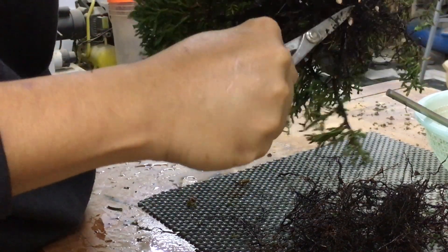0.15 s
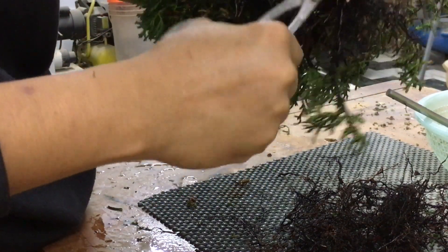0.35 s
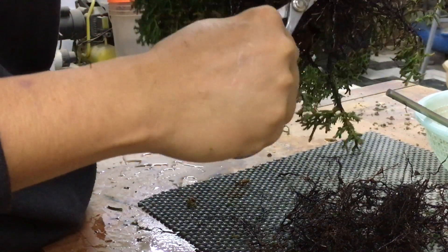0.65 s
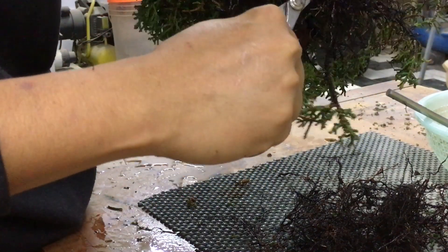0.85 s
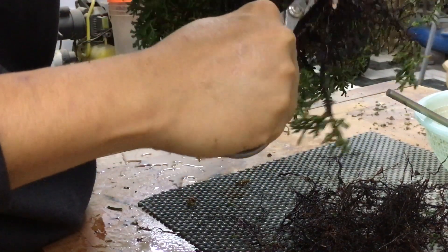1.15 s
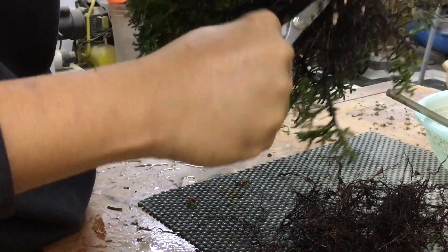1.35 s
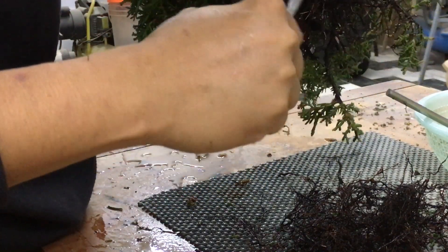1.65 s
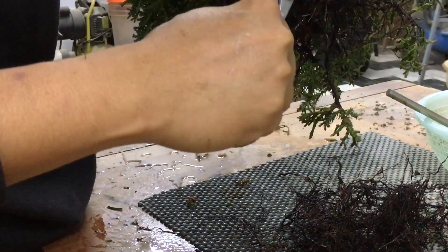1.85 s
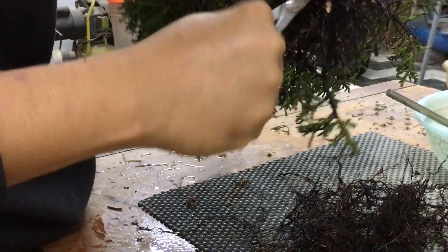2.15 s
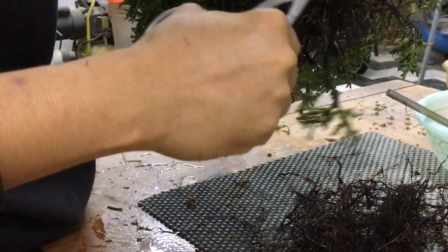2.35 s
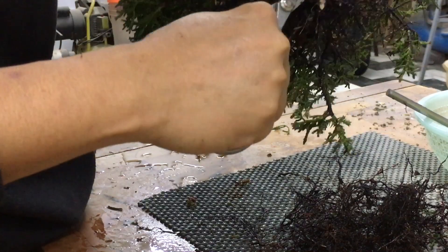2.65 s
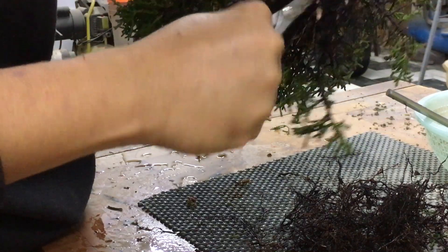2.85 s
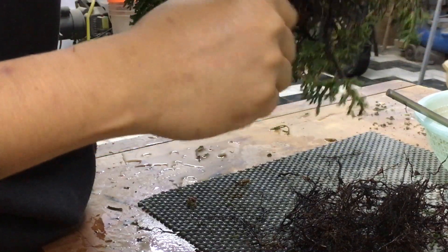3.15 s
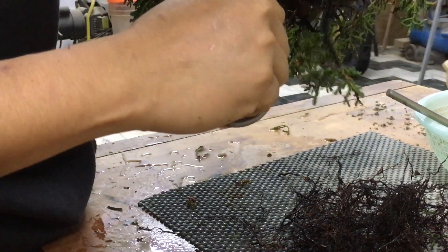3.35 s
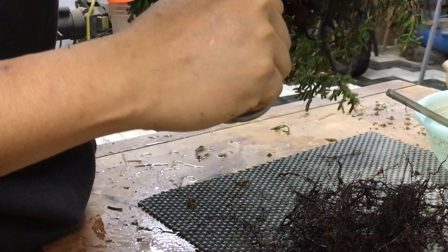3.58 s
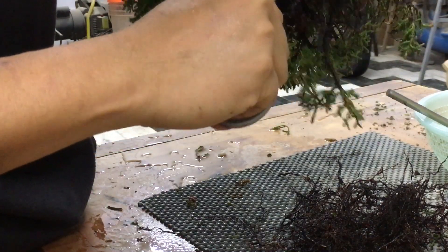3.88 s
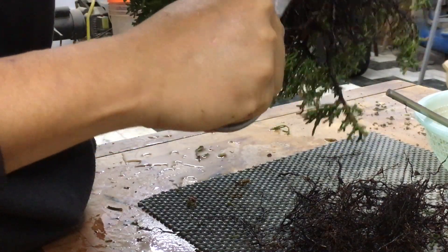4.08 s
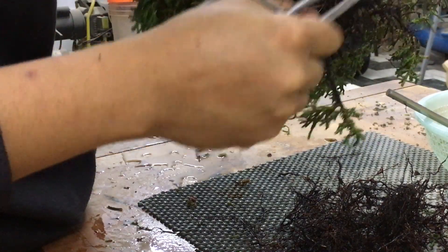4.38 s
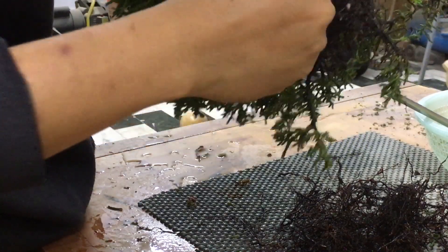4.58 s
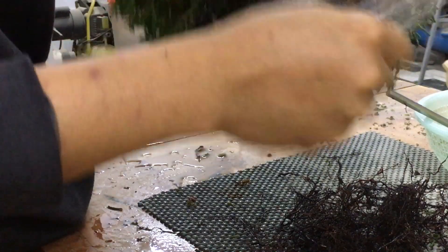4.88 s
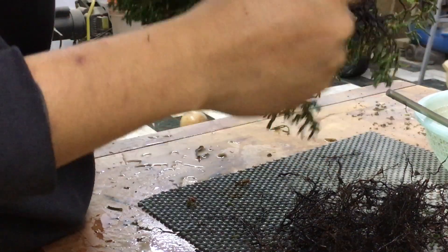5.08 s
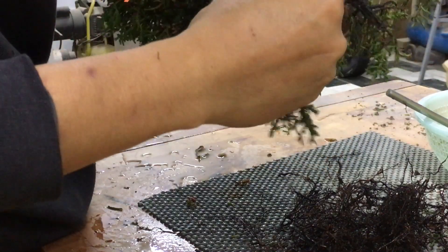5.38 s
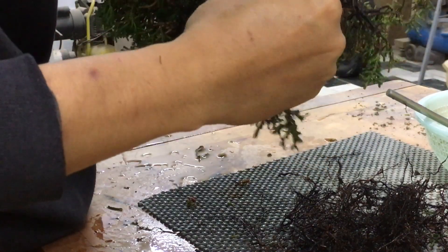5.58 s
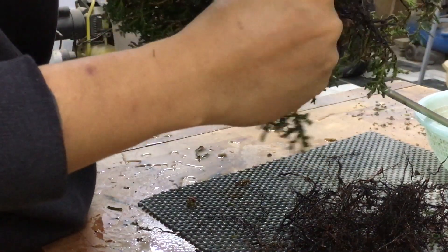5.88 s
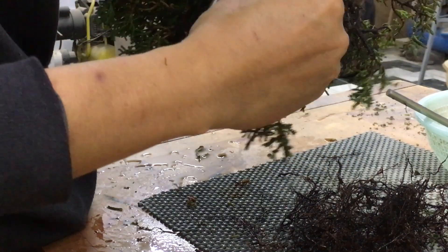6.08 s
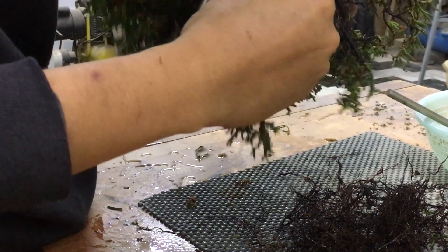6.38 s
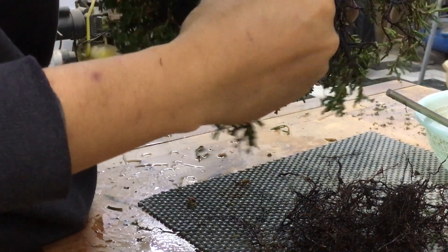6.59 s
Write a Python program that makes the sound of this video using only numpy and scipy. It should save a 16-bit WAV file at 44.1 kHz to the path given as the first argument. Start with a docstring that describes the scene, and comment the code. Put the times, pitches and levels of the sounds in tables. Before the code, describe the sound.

Close, slightly hissy phone pickup in a large shed with low, wavering traffic rumble outside. At 0.12 s scissors slam through a woody root: a loud, bright, dry crack with a tiny fibre snap just before it, a very short steel ring and an airy tail under half a second. Faint ticks follow, then a lighter double click around 1.3 s with a soft needle rustle. A second snip lands at 2.07 s, a little softer; small crackles gather from 2.6 s into a third at 2.79 s. Weak ticks and leafy brushes pass at 3.1 to 3.6 s before the strong fourth snip at 4.12 s. From about 4.5 s an engine approaches outside, a low uneven drone, joined after 5 s by puffing clatter and a thin rough whine that steps up slightly near 6 s. Twigs rustle at 6.3 s; a dull wooden knock sounds at 6.63 s.

```python
"""Root snipping in a shed

Small steel scissors snip woody roots at a worktable in a large shed, close to a phone microphone.
Fibres crack just before the blades slam shut: noise bursts with damped blade rings and a shed tail.
Twigs tick in short noise bursts, foliage rustles in noise swells, and damped modes make a wooden knock.
Outside, shaped noise and a low tone rumble as traffic; an engine of firing multiples draws nearer, whining."""
import sys
import numpy as np
from scipy import signal
from scipy.fft import rfft, irfft, next_fast_len
from scipy.io import wavfile
from scipy.ndimage import map_coordinates

SR = 44100
rng = np.random.default_rng(int(sys.argv[2]) if len(sys.argv) > 2 else 0)


def store_pcm(level_fs):
    """Save levels as 16-bit WAV."""
    pcm = np.round(np.clip(level_fs, -1, 1) * 32767).astype(np.int16)
    wavfile.write(sys.argv[1], SR, np.atleast_2d(pcm).T)


N = 296793  # samples
STEADY_TOP_HZ = 15800  # upper edge of hiss, clatter, rustles and shed tail


def amp(db):
    """Decibels to linear gain."""
    return 10 ** (np.asarray(db) / 20)


def unit(x):
    """Scale a signal to rms 1."""
    return x / np.sqrt(np.mean(x ** 2) + 1e-20)


def along(points, hz):
    """Read (frequency, value) points on a log frequency axis."""
    f, v = np.transpose(points)
    return np.interp(np.log(hz + 1), np.log(f + 1), v)


def curves(rows):
    """One value per sample for each column after the time."""
    s, *cols = np.transpose(rows)
    return [np.interp(np.arange(N) / SR, s, c) for c in cols]


def wobble(rate):
    """A smooth random curve, rate knots a second."""
    knots = rng.standard_normal(N // 100 + 9)
    return map_coordinates(knots, [np.arange(N) * rate / SR])


def filtered(x, response):
    """Shape the spectrum of x by a gain that depends on frequency."""
    m = next_fast_len(len(x) + 8192)
    hz = np.fft.rfftfreq(m, 1 / SR)
    return irfft(rfft(x, m) * response(hz), m)[:len(x)]


def noise(response, size=N):
    """Coloured noise of rms 1."""
    return unit(filtered(rng.standard_normal(size), response))


def add(track, s, sound):
    """Mix a sound in at a time in seconds, cut off at the end of the track."""
    part = track[round(s * SR):][:len(sound)]
    part += sound[:len(part)]


def band(centre_hz, octaves):
    """A bell-shaped pass band on a log axis, closing steeply above 16 kHz."""
    return lambda hz: np.exp(-(np.log2((hz + 1) / centre_hz) / octaves) ** 2) / (1 + (hz / 16000) ** 40)


def thin(x):
    """Things this small send out no bass: a steep fall below 950 Hz."""
    return filtered(x, lambda hz: 1 / np.sqrt(1 + (950 / (hz + 1)) ** 8))


def ringing(modes, t):
    """Damped modes, struck a little differently each time."""
    out = 0
    for hz, db, t60 in modes:
        strike_db = db + rng.normal(0, 1.2)
        out = out + amp(strike_db - 60 * t / t60) * np.sin(2 * np.pi * hz * t)
    return out


# Spectra of rumble, boom, tyre roar and microphone hiss: (frequency [Hz], relative density [dB per Hz])
RUMBLE_COLOUR = [(14, -28), (22, -6), (32, -1.5), (45, -0.5), (70, 4.5), (90, -6.5), (115, -49.5),
                 (160, -100)]
BOOM_COLOUR = [(90, -92.5), (120, -43.5), (150, 2), (168, 3.5), (195, 3.5), (230, -17), (300, -87.5)]
ROAR_COLOUR = [(47, -37), (80, -0.5), (113, -0.5), (197, -8.5), (230, -2.5), (407, -11), (501, -17.5),
               (672, -15), (758, -16), (827, -15.5), (1520, -17), (3730, -25.5), (5000, -34.5), (6500, -80),
               (11000, -120)]
HISS_COLOUR = [(2500, -29.5), (3300, -14), (4300, -10), (4900, -17.5), (5500, -6.5), (6500, -7.5),
               (7600, -10.5), (9300, -7), (10000, -8.5), (10500, -13), (11200, -6.5), (13500, -6),
               (15800, -7)]
# Rides of the rumble's throb, the boom and the tyre roar, before their wavering: (time [s], level [dB])
THROB_RIDE = [(0, -53.5), (.8, -57), (1.1, -63.5), (1.3, -54.5), (2, -59.5), (2.5, -51), (2.85, -52.5),
              (3.2, -59), (3.8, -63), (4.05, -54.5), (4.8, -62), (5.4, -63), (5.65, -60), (6.2, -63.5),
              (6.35, -52), (6.73, -63)]
BOOM_RIDE = [(0, -65), (1.1, -65.5), (2.2, -59), (2.9, -61), (3.3, -55.5), (3.7, -59.5), (5, -63),
             (6.73, -62.5)]
ROAR_RIDE = [(0, -58), (1.18, -56.5), (1.8, -57.5), (2.4, -61), (4.42, -60.5), (5.44, -55.5), (5.83, -56),
             (6.49, -57.5), (6.73, -55.5)]


def street():
    """Traffic as a wavering low tone with noise, a boom and tyre roar, over steady microphone hiss."""
    (throb_db,), (boom_db,), (roar_db,) = curves(THROB_RIDE), curves(BOOM_RIDE), curves(ROAR_RIDE)
    throb_hz = 55 + 3.5 * wobble(14)
    throb = np.sqrt(2) * np.sin(2 * np.pi * np.cumsum(throb_hz) / SR)
    swell_db = 3 * wobble(3)
    rumble = amp(throb_db + 3.3 * wobble(12)) * throb
    rumble += amp(-63.0 + swell_db) * noise(lambda hz: amp(along(RUMBLE_COLOUR, hz)))
    boom = amp(boom_db + 1.5 * wobble(5.5)) * noise(lambda hz: amp(along(BOOM_COLOUR, hz)))
    roar = amp(roar_db + 0.67 * wobble(4)) * noise(lambda hz: amp(along(ROAR_COLOUR, hz)))
    hiss = amp(-70.5) * noise(lambda hz: amp(along(HISS_COLOUR, hz)) * (hz < STEADY_TOP_HZ))
    return rumble + boom + roar + hiss


def peaks(modes, hz):
    """Combined gain of a row of resonances, summed as power."""
    return np.sqrt(sum(amp(db) ** 2 / (1 + (2 * (hz - c) / w) ** 4) for c, w, db in modes))


# Engine approach: (time [s], firing rate [Hz], level [dB])
ENGINE_RIDE = [(4.2, 37.4, -79.5), (4.6, 37.7, -64), (4.95, 38.8, -60.5), (5.4, 40, -55.5),
               (5.6, 37.6, -56.5), (5.85, 39, -58), (6.28, 39.1, -56.5), (6.6, 37.5, -60),
               (6.73, 39.1, -66.5)]
# Engine tones: (multiple of the firing rate [-], relative level [dB], wander [dB])
FIRING_TONES = [(2, -17.5, 5.5), (4, 0, 2.5), (5, -2, 4.5), (6, -12.5, 2.5), (7, -14, 4.5), (8, -18, 4),
                (9, -11, 5.5), (12, -19, 5.5), (14, -22.5, 5)]
# Casing clatter, before its puffing: (time [s], level [dB])
CLATTER_RIDE = [(4.9, -85), (5.35, -66), (5.7, -65.5), (5.9, -69.5), (6.73, -68.5)]
# Casing resonances: (frequency [Hz], width [Hz], relative level [dB])
CASING_MODES = [(1230, 90, 4), (1380, 110, -2.5), (1650, 82, -3.5), (2650, 35, -1.5), (3150, 97, -8),
                (3320, 120, -6.5), (6140, 1500, -14.5)]
# Gear whine, before its roughness: (time [s], frequency [Hz], level [dB])
WHINE_RIDE = [(5, 2070, -91.5), (5.3, 2025, -64), (5.8, 1985, -68), (5.93, 2000, -71.5),
              (5.98, 2200, -64.5), (6.1, 2205, -68), (6.73, 2210, -67)]


def engine():
    """Wandering multiples of the firing rate, casing clatter puffed once a firing, and a rough gear whine."""
    (firing_hz, level_db), (clatter_db,) = curves(ENGINE_RIDE), curves(CLATTER_RIDE)
    firing_phase = 2 * np.pi * np.cumsum(firing_hz) / SR
    drone = np.zeros(N)
    for multiple, db, wander_db in FIRING_TONES:
        tone_db = level_db + db + wander_db * wobble(9)
        drone += np.sqrt(2) * amp(tone_db) * np.sin(multiple * firing_phase + .7 * wobble(9))
    casing = noise(lambda hz: peaks(CASING_MODES, hz) * (hz < STEADY_TOP_HZ))
    clatter = amp(clatter_db + 2.0 * np.cos(firing_phase)) * casing
    whine_hz, whine_db = curves(WHINE_RIDE)
    roughness = .4 + .9 * wobble(260)
    whine = amp(whine_db) * roughness * np.sin(2 * np.pi * np.cumsum(whine_hz) / SR)
    return drone + clatter + whine


# Foliage swells: (middle time [s], level [dB])
BRUSHES = [(.64, -74.5), (1.0, -75), (1.233, -72), (1.328, -71), (2.04, -67), (2.66, -76), (3.191, -73),
           (3.567, -66.5), (4.042, -68), (4.73, -71.5), (4.851, -74), (6.295, -68), (6.42, -72)]


def foliage():
    """Needles brush past each other: swells of lumpy bright noise."""
    half_length_s, centre_hz = .038, 12500
    out, t = np.zeros(N), np.arange(-8000, 8000) / SR
    lumps = amp(4 * wobble(200))
    swell = np.exp(-(t / half_length_s) ** 2)
    for middle_s, db in BRUSHES:
        swish = noise(lambda hz: band(centre_hz, .7)(hz) * (hz < STEADY_TOP_HZ), size=len(t))
        add(out, middle_s + t[0], amp(db) * swell * swish)
    return out * unit(lumps)


# Something set down across the shed: (time [s], level [dB])
KNOCK_HITS = [(6.628, -46)]
# Wooden modes of the knock: (frequency [Hz], relative level [dB], t60 [s])
WOOD_MODES = [(408, 7.5, 0.052), (522, 2.5, 0.034), (690, -5, 0.056), (983, 1, 0.051), (2040, -6, .05),
              (2210, -3.5, 0.041), (2590, -5, 0.036)]


def knock():
    """A dull wooden knock: damped modes behind a soft 2 ms onset."""
    out, t = np.zeros(N), np.arange(4000) / SR
    for s, db in KNOCK_HITS:
        onset = 1 - np.exp(-t / 0.002)
        add(out, s, amp(db) * ringing(WOOD_MODES, t) * onset)
    return out


# Decay of the shed's diffuse tail: (frequency [Hz], t60 [s])
SHED_DECAY = [(1000, .3), (2600, 0.45), (7000, 0.48), (11000, 0.39), (15000, 0.21)]
# Echoes off the near walls: (delay [s], relative level [dB])
WALL_ECHOES = [(.011, -22), (.0225, -23)]


def shed(sound, db, colour):
    """A sound with two wall echoes and a diffuse tail that dies at its own speed for each frequency."""
    air = noise(lambda hz: colour(hz) * (hz < STEADY_TOP_HZ) * (hz > 2000), size=30000)
    hz, t, z = signal.stft(air, SR, nperseg=128)
    decay = amp(-60 * t / along(SHED_DECAY, hz)[:, None])
    tail = signal.istft(z * decay, SR, nperseg=128)[1]
    tail = tail * (1 - np.exp(-np.arange(len(tail)) / SR / .003))  # builds up as more walls join
    out = amp(db) * np.linalg.norm(sound) * tail / np.linalg.norm(tail)  # db: tail energy against the sound
    add(out, 0, sound)
    for delay, wall_db in WALL_ECHOES:
        add(out, delay, amp(wall_db) * sound)
    return out


def click(db, t):
    """The dull push under a crack: one heavily damped swing."""
    return amp(db - 60 * t / 0.0012) * np.sin(2 * np.pi * 1700 * t)


# Fibre cracks and twig ticks: (time [s], level [dB], centre [Hz], width [octaves])
CRACKS_AND_TICKS = [(0.1145, -42, 11120, .9), (0.1175, -24, 11960, 1), (.465, -57, 11030, .9),
                    (0.7118, -51.5, 8500, 1), (1.2726, -26, 13300, 1.33), (1.3010, -30.5, 12300, 1.1),
                    (1.4078, -37, 8900, 2), (1.628, -55.5, 11000, 1), (2.0624, -41, 10640, 1.5),
                    (2.0692, -29, 12260, 0.91), (2.626, -49, 12000, 1.06), (2.642, -59, 10040, .8),
                    (2.657, -55, 13500, .4), (2.702, -58, 13000, .5), (2.726, -35, 13500, 1.25),
                    (2.7572, -37.5, 11850, 0.87), (2.7735, -43, 12300, .54), (2.778, -32, 12050, .6),
                    (2.7818, -30, 11740, .6), (2.785, -35, 13020, 0.85), (3.1279, -49, 6500, 0.67),
                    (3.129, -49, 2600, 0.2), (3.1724, -48, 11400, 0.9), (3.5519, -51.5, 8950, 1.4),
                    (3.584, -47.5, 11000, 1.9), (4.107, -48, 11000, .4), (4.111, -35.5, 10990, 0.97),
                    (4.1147, -27.5, 11500, .45), (4.727, -55, 12960, .4), (4.7538, -54, 13960, .31),
                    (5.074, -48, 5000, 2.3), (6.2523, -45, 9520, 1.1), (6.297, -57, 13080, .39),
                    (6.415, -56, 14520, 0.29), (6.628, -48.5, 8900, .39)]


def ticks():
    """Each tick is a sharp noise burst around its own centre, over a dull click that grows with it."""
    tail_t60, skirt_db = 0.012, -20  # s; weak broad crackle under each band
    click_db, click_grows = -39, .5  # click under a -40 dB tick; dB per dB of tick
    out, t = np.zeros(N), np.arange(3000) / SR
    fall = amp(-60 * t / 0.0029) + .6 * amp(-60 * t / tail_t60)
    envelope = fall * (1 - np.exp(-t / 0.00013))
    for s, db, centre_hz, octaves in CRACKS_AND_TICKS:
        colour = lambda hz: band(centre_hz, octaves)(hz) + amp(skirt_db) * band(6000, 1.8)(hz)
        burst = amp(db) * envelope * noise(colour, size=len(t))
        push = click(click_db + click_grows * (db + 40), t)
        add(out, s, shed(burst + push, -15.0, colour))
    return thin(out)


# Blades slamming shut: (time [s], level [dB], last-fibre t60 [s], shed tail [dB], tilt [dB per octave],
# table bounce comb spacing [Hz], strongest ring [Hz])
BLADE_SLAMS = [(0.1197, -7.5, 0.021, -10, -0.5, 1333, 10660), (2.0732, -11, 0.026, -10.5, -1, 1270, 11700),
               (2.7893, -11.5, 0.028, -13.5, 1, 1272, 11400), (4.118, -7, 0.02, -10, 0.5, 1346, 10970)]
# Spectra of the crack and of its shed tail: (frequency [Hz], relative density [dB per Hz])
CRACK_COLOUR = [(500, -69.5), (1000, -30.5), (1500, -28), (2500, -24), (3200, -26.5), (4100, -22),
                (5500, -15), (8000, -11.5), (11000, -4), (12600, -3.5), (14400, 2), (15600, -6),
                (16000, -23), (16800, -37.5)]
TAIL_COLOUR = [(2000, -19.5), (2450, -11.5), (3200, -20.5), (4200, -13.5), (4850, -19.5), (5400, -14.5),
               (6500, -14.5), (8300, -15), (9500, -7.5), (11000, -6), (13700, -2.5), (15800, -9.5)]
# Damped ring of the held blades: (frequency [Hz], relative level [dB], t60 [s])
BLADE_MODES = [(11220, 1.5, 0.018), (11900, -10.5, .025), (13600, -7, 0.018), (9600, -45.5, .025)]


def snips():
    """The root gives way: a ragged burst of cracking, with the short damped ring of the held blades."""
    ring_db, lift_db, click_db = -10.5, 4.5, -16.5  # blade modes, strongest ring, dull click
    tail_tilt_db = 1.5  # per octave
    out, t = np.zeros(N), np.arange(3000) / SR
    sharp = amp(-60 * t / .007)
    onset = 1 - np.exp(-t / 0.00025)
    for s, db, t60, shed_db, tilt_db, comb_hz, ring_hz in BLADE_SLAMS:
        def comb(hz):
            """Comb of a table bounce under a millisecond late, lifted at the strongest ring."""
            bounce = np.abs(1 + 0.5 * np.exp(2j * np.pi * hz / comb_hz))
            return bounce * amp(lift_db * band(ring_hz, .06)(hz))

        def tilted(points, slope_db):
            """A combed spectrum tilted around 11 kHz."""
            return lambda hz: amp(along(points, hz) + slope_db * np.log2((hz + 1) / 11000)) * comb(hz)

        fall = sharp + 0.63 * amp(-60 * t / max(t60, .004))  # a sharp break, then the last fibres
        crack = noise(tilted(CRACK_COLOUR, tilt_db), size=len(t)) * fall
        crack = crack + amp(ring_db) * ringing(BLADE_MODES, t)
        snap = amp(db) * crack * onset + click(db + click_db, t)
        add(out, s, shed(snap, shed_db, tilted(TAIL_COLOUR, tail_tilt_db)))
    return thin(out)


def scene():
    """All layers summed to one channel."""
    return (street() + engine() + foliage() + knock() + ticks() + snips())[None]


def record(dry):
    """The phone keeps nothing above its band limit."""
    top_hz = 16800
    return filtered(dry[0], lambda hz: hz < top_hz)[None]


dry = scene()
out = record(dry)
store_pcm(out)
```